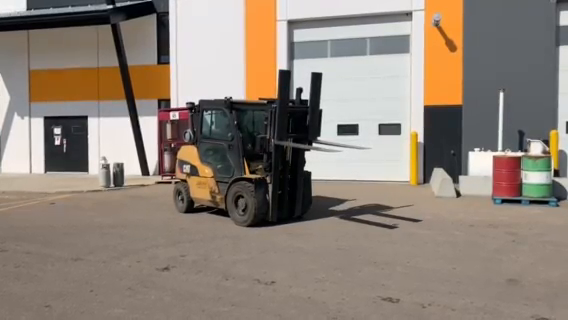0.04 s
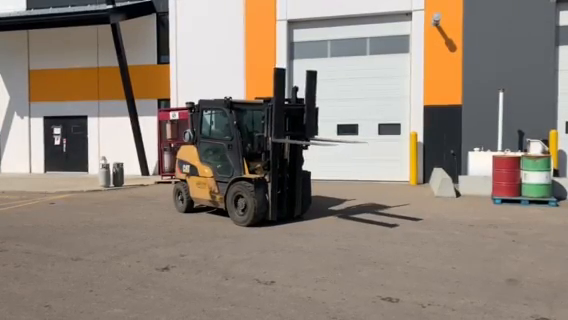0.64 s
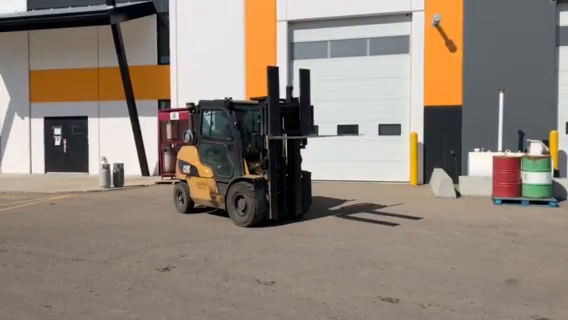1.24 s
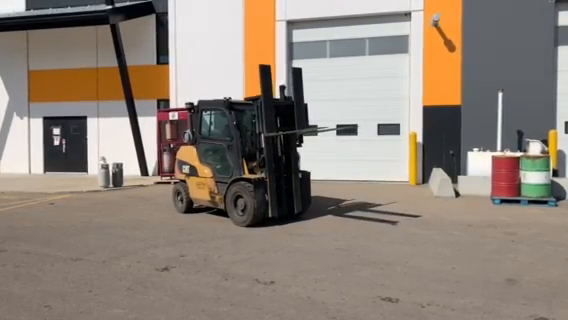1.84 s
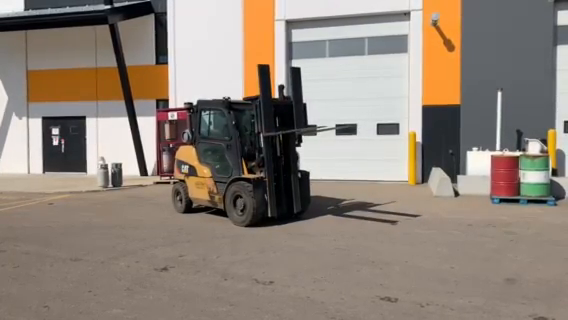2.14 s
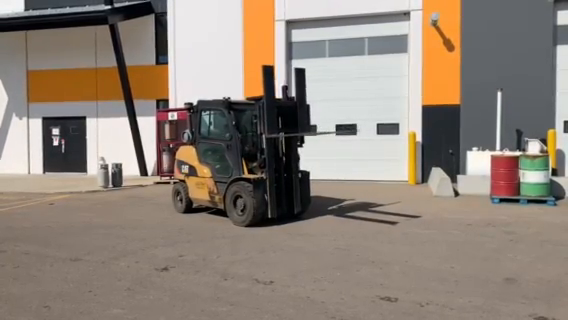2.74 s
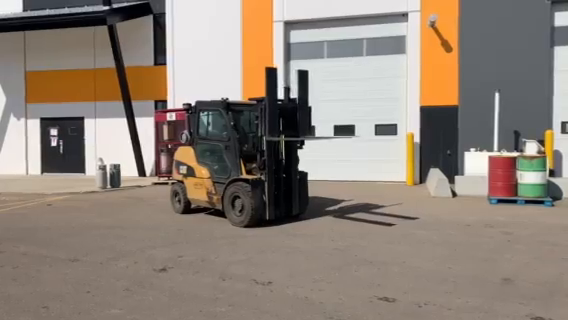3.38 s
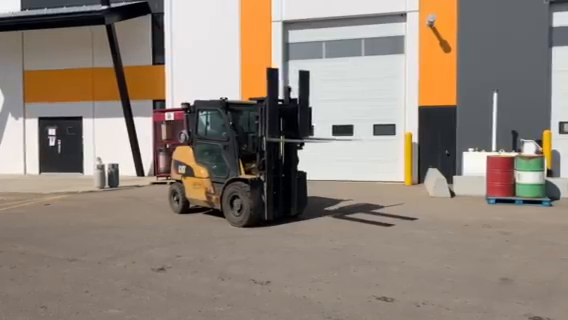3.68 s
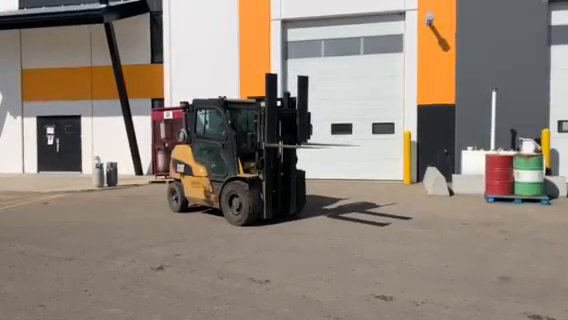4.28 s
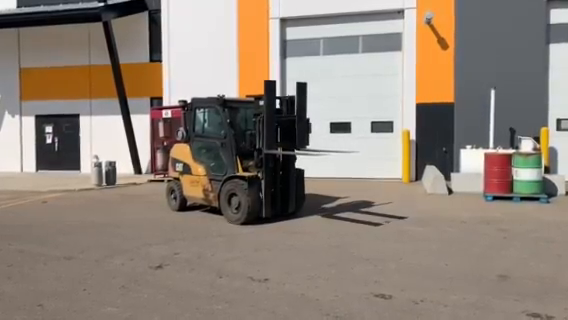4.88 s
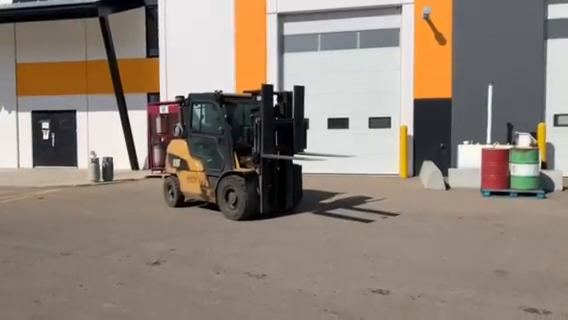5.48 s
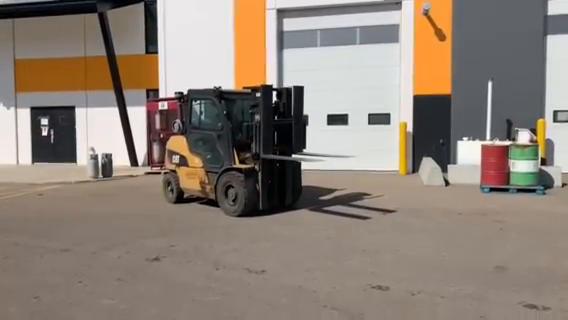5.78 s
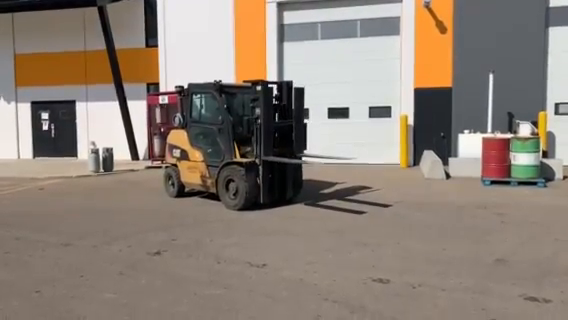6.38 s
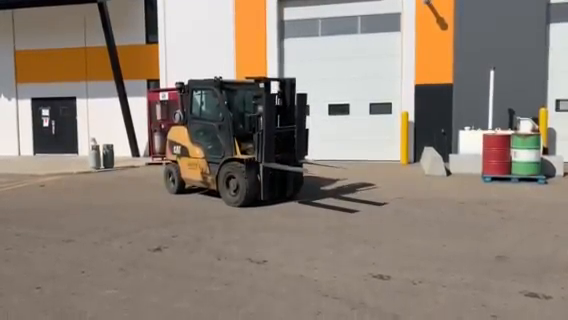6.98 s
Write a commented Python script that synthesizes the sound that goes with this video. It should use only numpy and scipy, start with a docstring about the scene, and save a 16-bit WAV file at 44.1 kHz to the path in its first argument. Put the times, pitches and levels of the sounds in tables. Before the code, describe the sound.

A forklift engine rumbles throughout, heard from across an outdoor yard. A metal knock and a dull bump come right at the start, followed by small squeaks. From about 0.3 to 2.2 seconds a faint hydraulic pump whine sounds as the engine slows slightly. Sharp, bouncing steel clanks with chain clinks hit at about 2 and 2.4 seconds, echoing briefly off the walls. A lighter knock, a squeak and a short pump squeal come between 3.1 and 3.5 seconds. The forks rattle lightly a few times as the engine and its whine rise, peaking near 4.7 seconds and then falling. Oil hisses faintly from around 4 seconds. A few dull bumps come between 5.3 and 5.7 seconds, then a brief soft rush of air, and the engine runs on lower and a little quieter until 7 seconds.

```python
"""A forklift lifts and lowers its forks.

On a paved yard by a warehouse, the engine rumbles and revs, and the oil pump and a gear whine with it.
The pump squeals briefly, and later oil hisses through the lowering valve. The fork carriage knocks
against the mast (the upright steel frame) and bounces, jerking the chain; walls echo the knocks."""
import sys
import numpy as np
from scipy import signal
from scipy.fft import rfft, irfft, next_fast_len
from scipy.io import wavfile

SR = 44100
rng = np.random.default_rng(int(sys.argv[2]) if len(sys.argv) > 2 else 0)


def transcribe(u):
    """Save the signal u as a 16-bit wav file named by the first command-line argument.

    u: samples, shape (n,) or (channels, n), limited to [-1, 1]; the rate is SR.
    q: integer samples, one column per channel.
    """
    v = np.clip(np.atleast_2d(u).T, -1, 1)
    q = np.round(v * 32767).astype(np.int16)
    wavfile.write(sys.argv[1], SR, q)


N = 309567
CUTOFF_HZ = 15850
TEETH_PER_FIRING = 16.4   # pump teeth that pass for each firing of the engine
UNLOAD_S = 5.77   # the load comes off the engine

# tone colour of the exhaust: f/Hz, relative level/dB
EXHAUST_COLOUR = [(50, -20), (75, 2.5), (115, 3.5), (180, 1.5), (225, -2.5), (290, -4), (360, -4.5),
                  (500, -28)]
# strokes, when the pump works against pressure: start/s, end/s, whine/dB, oil hiss/dB, sag/(dB per s)
PUMP_STROKES = [(.29, 2.2, -46, -52.5, -3.5), (2.45, 3.05, -64, -55, -8), (3.09, 3.68, -39.5, -53.5, -24)]


def from_db(db):
    """Turn decibels into a factor to multiply by."""
    return 10 ** (np.asarray(db) / 20)


def rms_one(x):
    """Scale a signal to an average power of 1."""
    return x / np.sqrt(np.mean(x ** 2) + 1e-20)


def seconds():
    """The time of every sample."""
    return np.arange(N) / SR


def in_time(points):
    """Join (time, value) points with straight lines, one value per sample."""
    return np.interp(seconds(), *np.transpose(points))


def at_hz(points, hz):
    """Read between (frequency, value) points, with octaves evenly spaced."""
    f, value = np.transpose(points)
    return np.interp(np.log(hz), np.log(f), value)


def drift(rate_hz):
    """A smooth random wobble of typical size 1; a higher rate wobbles faster."""
    pole = np.exp(-80 * np.pi * rate_hz / SR)
    white = rng.standard_normal(N // 40 + 2002)   # one value per 40 samples, plus a run-in
    slow = signal.lfilter([1], [1, -2 * pole, pole * pole], white)[2000:]
    return np.interp(np.arange(N) / 40, np.arange(len(slow)), rms_one(slow))


def dull(x, hz):
    """Gently soften the treble above hz."""
    return signal.sosfilt(signal.butter(1, min(hz, SR / 2 - 1000), fs=SR, output="sos"), x)


def switch_on(s, takes_s):
    """A smooth step from 0 to 1 around time s."""
    return .5 + .5 * np.tanh(2 * (seconds() - s) / takes_s)


def stroke(start, end, sag_db_per_s=0, ramp_s=0.045):
    """Pressure builds, holds or sags, and is let go."""
    sag = from_db(sag_db_per_s * np.clip(seconds() - start, 0, end - start))
    return switch_on(start, ramp_s) * sag * (1 - switch_on(end, ramp_s))


def swell(s, half_length):
    """A smooth bump that peaks at time s."""
    return np.exp(-((seconds() - s) / half_length) ** 2)


def burst(s, rise_s, fade_s):
    """A quick rise from time s, then a fade. Every fade time here is the time to drop 60 dB."""
    age = np.maximum(seconds() - s, 0)
    return np.minimum(age / rise_s, 1) * from_db(-60 * np.maximum(age - rise_s, 0) / fade_s)


def tone(cycles, flutter_db, wander):
    """A nearly pure tone that trembles in level and in phase (wander, in radians)."""
    return np.sqrt(2) * from_db(flutter_db * drift(25)) * np.sin(2 * np.pi * cycles + wander * drift(17))


def noise(colour, shape=lambda hz: 1, size=N, spread=1):
    """Stereo noise of power 1, in bands a third of an octave wide; shape(hz) moves each band's level."""
    # how alike left and right are: f/Hz, likeness (1 = the same)
    likeness = [(50, 0.77), (200, 0.95), (400, 0.87), (700, 0.38), (1400, 0.23), (3000, 0.3), (5000, 0.073),
                (7000, 0.97), (8500, 1), (11000, 0.66), (13500, .9), (15500, 0.65)]
    low, high = colour[0][0], min(colour[-1][0], CUTOFF_HZ)
    edges = 20 * 2 ** (np.arange(30) / 3)
    white, out = rng.standard_normal((2, 2, size)), 0
    for k, band in enumerate(zip(edges, edges[1:])):
        hz = np.sqrt(band[0] * band[1])
        if low < hz < high:
            mid, side = signal.sosfilt(signal.butter(2, band, "band", fs=SR, output="sos"), white[k % 2])
            apart = np.clip((1 - at_hz(likeness, hz)) * spread, 0, 2)
            pair = np.sqrt(2 - apart) * mid + np.sqrt(apart) * side * [[1], [-1]]
            out = out + from_db(at_hz(colour, hz)) * shape(hz) * pair
    return rms_one(out)


def resonant_noise(hz, width):
    """Stereo noise of power 1 that rings around one pitch."""
    b, a = signal.iirpeak(hz, hz / width, fs=SR)
    white = rng.standard_normal((2, N))
    return rms_one(signal.lfilter(b, a, signal.lfilter(b, a, white)))


def throttle(revs, lag_s=0.84):
    """Heads for 1 (open) as the engine speeds up and for -1 (shut) as it slows, lagging behind."""
    pole = np.exp(-1 / (lag_s * SR))
    return np.tanh(4 * signal.lfilter([1 - pole], [1, -pole], np.gradient(revs) * SR))


def engine(firings, firing_hz, revs, waver_db=4.0, muffler_hz=400):
    """Each firing puffs into the exhaust and rattles the engine block; the chassis rumbles below."""
    # tones of the exhaust: multiple of the firing rate, relative level/dB
    exhaust_tones = [(1, 5), (1.5, 2), (2, -0.5), (2.5, 0), (3, 3.5), (4, 0), (5, -5), (6, -0.5)]
    # tone colours of the block and the chassis: f/Hz, relative level/dB
    block_colour = [(250, 2), (460, 0.5), (600, 4), (740, 2.5), (1000, -0.5), (1400, -6), (1800, -9),
                    (2300, -14), (2800, -19.5), (3500, -19.5), (6000, -46)]
    chassis_colour = [(20, -47), (31, -52), (43, 12), (60, 14), (80, 10.5), (120, -3)]
    # deep rumble of the chassis: t/s, level/dB
    rumble = [(0, -30.5), (1.2, -33), (2.7, -31), (3.3, -34), (4.3, -31.5), (5.2, -37), (7.02, -34)]
    unloaded, push = switch_on(UNLOAD_S, takes_s=0.036), throttle(revs)
    exhaust_db = -29 + 7 * revs + 0.5 * push - 3.5 * unloaded
    block_db = -37.5 + 1.5 * revs + push - 1.5 * unloaded
    beat = np.cos(2 * np.pi * firings + 0.31 * drift(6.5))
    # uneven burning makes every tone waver in level and phase
    note = sum(from_db(db + at_hz(EXHAUST_COLOUR, k * firing_hz) + waver_db * drift(4.9))
               * np.sin(2 * np.pi * k * firings + 0.89 * drift(3.7)) for k, db in exhaust_tones)
    gas = noise(EXHAUST_COLOUR, lambda hz: from_db(-0.5 * beat + 2.1 * drift(16.8)))
    puffs = from_db(exhaust_db) * (from_db(-2.5) * rms_one(note) + gas)
    exhaust = signal.sosfilt(signal.butter(10, muffler_hz, fs=SR, output="sos"), puffs)
    clatter = from_db(0.04 * beat + .5 * drift(21))
    block = from_db(block_db) * noise(block_colour, lambda hz: clatter * from_db(drift(27)))
    shake = np.sqrt(2) * np.sin(2 * np.pi * firings + 1.1 * drift(3.7))
    chassis = from_db(in_time(rumble)) * (noise(chassis_colour) + .5 * shake)
    return exhaust + block + chassis


def intake(firings, revs, gulp_db=3.0, boom_db=-3.0):
    """Each cylinder gulps air through a ringing duct, which growls and booms near full speed."""
    # where the duct rings: f/Hz, width/Hz, relative level/dB
    resonances = [(214, 44, -3), (330.4, 55, -9), (690, 320, -14.5)]
    duct = sum(from_db(db) * resonant_noise(hz, width)[0] for hz, width, db in resonances)
    boom = from_db(boom_db) * tone(3 * firings, flutter_db=2.5, wander=.5)
    gulps = from_db(gulp_db * np.cos(2 * np.pi * firings))
    return from_db(-52 + 47 * revs) * (gulps * duct + boom)


def pump_shell(revs):
    """The running engine shakes the thin pump housing into a faint, rough ring."""
    return from_db(-61 + 9 * revs + 2 * drift(10)) * resonant_noise(hz=2315, width=110)[0]


def hiss(air_db=-54.5, rush_db=-52, rush_s=0.32):
    """Air hisses steadily and oil with each stroke; air rushes briefly as the load comes off."""
    # tone colours of the hiss and the rush: f/Hz, relative level/dB
    hiss_colour = [(2000, 6), (3400, 4.5), (5000, 1), (7000, 2.5), (8500, 2.5), (10500, -0.5),
                   (13000, -4.5), (16000, -14)]
    rush_colour = [(2300, -14), (3000, 3), (3600, -9), (4500, -21), (6000, -7), (8000, -16)]
    oil = sum(from_db(db) * stroke(start, end) for start, end, _, db, _ in PUMP_STROKES)
    air_and_oil = np.hypot(from_db(air_db), oil) * noise(hiss_colour, lambda hz: from_db(drift(34)))
    rush = from_db(rush_db) * stroke(UNLOAD_S, UNLOAD_S + rush_s) * noise(rush_colour)
    return air_and_oil + rush


def chain(rise_s=0.0039, fade_s=0.18):
    """The links of the jerked lift chain clash in short, bright bursts."""
    # clinks: t/s, level/dB
    clinks = [(.004, -31.5), (1.949, -32), (2.044, -34.5), (2.384, -34.5), (2.499, -34.5)]
    # their tone colour: f/Hz, relative level/dB
    colour = [(2000, 7), (2800, -6), (3600, -2), (5200, 1), (7500, -6), (11000, -1), (16000, -9)]
    ages = [(np.maximum(seconds() - s, 0), db) for s, db in clinks]
    level = sum(from_db(db - 60 * age / fade_s) * np.minimum(age / rise_s, 1) for age, db in ages)
    return level * noise(colour, spread=0.66)


def mast_ring(t, ring_db, favoured_hz, crack_s=0.0048):
    """The struck mast gives a noisy clang, which cracks and then dies band by band, and clear tones."""
    # clear tones of the mast: f/Hz, relative level/dB, fade/s
    modes = [(253, 1, 0.35), (317.6, 0, 0.5), (349.5, 2.5, 0.44), (425, 3.5, 0.3), (547, 8.5, 0.15),
             (596, 5, 0.13), (752, 6, 0.18), (856.5, 6.5, 0.14), (1027, -0.5, 0.21), (1212, 1, 0.13),
             (1291, -1, .12), (1416, -6, .15), (1583, -2.5, 0.18), (1790, -3.5, .18), (2195, -2.5, .15),
             (2280, -0.5, 0.18), (2720, -5, 0.18), (3430, -11, 0.33), (4070, -16, 0.27), (4670, -16, .19)]
    # tone colour of the clang: f/Hz, relative level/dB
    colour = [(100, 6), (220, 6), (500, 6.5), (800, 0), (1200, -0.5), (1750, 0), (2400, -6), (2850, -7.5),
              (3400, -13.5), (4500, -16.5), (7000, -16.5), (11000, -14), (16000, -21)]
    # how long the clang lasts: f/Hz, fade/s
    fades = [(200, 0.41), (600, 0.34), (2000, 0.28), (5000, 0.31), (14000, 0.3)]

    def favour(hz, boost_db=5, octaves=0.16):
        """The spot that is hit brings out the tones around one pitch."""
        return boost_db * np.exp(-(np.log2(hz / favoured_hz) / octaves) ** 2)

    crack = 1.9 * np.exp(-t / crack_s)
    clang = noise(colour, lambda hz: from_db(favour(hz) / 2)
                  * (from_db(-60 * t / at_hz(fades, hz)) + crack), size=len(t), spread=0.26)
    ring = sum((-1) ** k * from_db(db + favour(hz) - 60 * t / fade_s) * np.sin(2 * np.pi * hz * t)
               for k, (hz, db, fade_s) in enumerate(modes))
    return clang / np.sqrt(len(t)), from_db(ring_db) * rms_one(ring) / np.sqrt(len(t))


def knocks(chatter_db=3.5, strength_db=22.5, bounce_s=0.034, graze_s=.006, graze_db=-14):
    """Loose steel grazes, lands and chatters while the mast rings on; the walls answer."""
    # hits, bounces and the loudest wall echoes: t/s, relative level/dB, brightness/Hz, contact/s, ring/dB,
    # favoured pitch/Hz
    hits = [(.006, -18, 14000, 0.0021, 1.5, 1120), (.041, -21.5, 3000, .003, 0, 850),
            (.105, -25, 9130, 0.0027, -5, 1890), (1.950, -10, 6000, .004, -1, 2270),
            (1.9555, -8.5, 9000, .003, 1, 1030), (1.961, -15, 2500, 0.0028, -2, 600),
            (1.987, -16, 9000, 0.0027, 2, 425), (2.047, -24, 12000, 0.0056, -1, 2250),
            (2.060, -23.5, 9000, .004, -1, 750), (2.3956, -14.5, 5005, 0.0027, 0, 1590),
            (2.401, -15, 3000, .003, 2, 548), (2.414, -20, 1500, .003, 3, 548),
            (2.429, -20.5, 4000, 0.0034, 0, 1590), (2.459, -24, 700, .004, 6, 350),
            (2.504, -20, 7000, 0.0026, -0.5, 2200), (3.101, -23, 700, .0038, 3, 548),
            (3.187, -19, 9000, 0.0087, 0, 1950)]
    # echoes from the walls: delay/s, relative level/dB, brightness/Hz
    walls = [(0.035, -16, 7960), (.103, -15, 6000), (0.215, -24.5, 4000)]
    out, t = np.zeros((2, N)), np.arange(SR // 2) / SR
    for s, db, bright_hz, contact_s, ring_db, favoured_hz in hits:
        contact = 1 - np.exp(-(2 * t / contact_s) ** 2)
        chatter = from_db(chatter_db * drift(90)[:len(t)] * (0.5 - np.exp(-t / bounce_s)))
        clang, ring = mast_ring(t, ring_db, favoured_hz)
        blow = dull((clang * chatter + ring) * contact, bright_hz)
        at = round(s * SR)
        out[:, at:at + len(t)] += from_db(db + strength_db) * blow[:, :N - at]
    # the graze is a softer copy just ahead of each hit
    graze = from_db(graze_db) * np.pad(out, [(0, 0), (0, round(graze_s * SR))])[:, -N:]
    echoes = sum(from_db(db) * dull(np.pad(out, [(0, 0), (round(s * SR), 0)])[:, :N], hz)
                 for s, db, hz in walls)
    return graze + out + echoes


def jolts():
    """The chassis booms briefly on its tyres."""
    # dull bumps: t/s, level/dB, half length/s, f/Hz
    bumps = [(0.008, -19.5, 0.028, 66), (2.462, -26, 0.14, 74), (4.335, -24, 0.045, 74),
             (5.28, -26.5, 0.035, 170), (5.562, -18.5, 0.058, 78), (5.723, -22.5, 0.023, 130)]
    waver, thud = 1.6 * drift(15.6), 0.39 * noise(EXHAUST_COLOUR)
    out = 0
    for s, db, half_length, hz in bumps:
        boom = np.sqrt(2) * np.sin(2 * np.pi * hz * seconds() + waver)
        out = out + from_db(db) * swell(s, half_length) * (boom + thud)
    return out


def roller_squeaks():
    """A mast roller sticks and slips, scraping out a thin ring that dies away."""
    # squeaks: t/s, f/Hz, width/Hz, level/dB, rise/s, fade/s
    squeaks = [(.283, 4800, 120, -48, .018, .17), (.355, 4680, 450, -52, .02, .5),
               (.489, 4840, 110, -39, 0.007, .1), (3.109, 8050, 447, -34, .004, 0.12)]
    return sum(from_db(db) * burst(s, rise_s, fade_s) * resonant_noise(hz, width)
               for s, hz, width, db, rise_s, fade_s in squeaks)


def pump_whine(teeth, tooth_hz, revs, flutter_db=2.0):
    """The pump sings as its teeth pass: rich under pressure, just a note and its octave when free."""
    # the note and its overtones, lowest first: relative level/dB
    harmonics = [1, -10, -15, -19, -22.5, -23]
    # where the pump housing rings: f/Hz, width/Hz, boost/dB
    housing = [(2095, 29, 13.5), (2210, 70, 9.5), (2322, 34, 12), (2782, 85, 10)]
    working = sum(from_db(db) * stroke(start, end, sag) for start, end, db, _, sag in PUMP_STROKES)
    free = from_db(-78.5 + 62.5 * revs) * (1 + 0.41 * drift(120))
    # every firing jerks the shaft forward, which roughens the high overtones most
    jerk = 0.11 * (np.sin(2 * np.pi * teeth / TEETH_PER_FIRING) + 2.2 * drift(23))
    out = 0
    for k, db in enumerate(harmonics, 1):
        housing_db = sum(boost * np.exp(-((k * tooth_hz - hz) / width) ** 2)
                         for hz, width, boost in housing)
        drive = working + (k <= 2) * free * from_db(-7.5 * np.log2(k))
        phase = k * (2 * np.pi * teeth + jerk + 0.39 * drift(24))
        # a reflection from a wall wavers separately on the left and right
        reflected = 0.24 * k * np.array([drift(37), drift(11)]) * np.cos(phase)
        flutter = from_db(flutter_db * drift(22) + 0.59 * k * drift(57))
        out = out + from_db(db + housing_db) * drive * flutter * (np.sqrt(2) * np.sin(phase) + reflected)
    return out


def oil_churn(flutter_db=2.0):
    """Oil churns in the pump through the long lift and thickens its whine."""
    # bands of churning: f/Hz, width/Hz, level/dB
    bands = [(1868, 80, -57), (2100, 81, -54), (2310, 76, -59.5), (2740, 96, -56.5), (4220, 200, -64.5)]
    start, end, _, _, sag = PUMP_STROKES[0]
    churn = sum(from_db(db + flutter_db * drift(18)) * resonant_noise(hz, width)[0]
                for hz, width, db in bands)
    return stroke(start, end, sag) * churn


def gear_whine(teeth, ratio=18 / 11):
    """While it is under load, a gear sings a note above the pump's."""
    # times under load: start/s, end/s, level/dB
    loads = [(0.414, 0.694, -45), (0.752, 1.05, -50.5), (1.053, 2.0, -43.5), (5.85, 6.303, -54.5)]
    level = sum(from_db(db) * stroke(start, end) for start, end, db in loads)
    return level * tone(ratio * teeth, flutter_db=2.0, wander=0.42)


def fork_rattles(rise_s=.011, chatter_db=3.0):
    """The loose forks shake briefly on their bar."""
    # muted shakes: t/s, level/dB, fade/s
    shakes = [(2.168, -35, .12), (3.279, -40, .3), (3.792, -41, 0.26), (3.9, -39.5, .12),
              (4.525, -35.5, .16)]
    # their tone colour: f/Hz, relative level/dB
    colour = [(900, -3), (1400, -1), (1900, 3.5), (2300, -2), (2900, -18), (4500, -19), (7000, -28)]
    level = sum(from_db(db) * burst(s, rise_s, fade_s) for s, db, fade_s in shakes)
    return level * from_db(chatter_db * drift(74)) * noise(colour)


def pump_squeal(teeth, harmonic=4):
    """The pump's fourth harmonic swells into a squeal, falling as the engine bogs down."""
    # swells of the squeal: peak/s, half length/s, level/dB
    swells = [(3.15, .055, -56), (3.315, .05, -48), (3.35, .2, -56)]
    level = sum(from_db(db) * swell(s, half_length) for s, half_length, db in swells)
    rasp = 1 + .25 * drift(110)
    return level * rasp * tone(harmonic * teeth + .04 * drift(70), flutter_db=1.0, wander=.4)


def lowering_valve(sputter_db=1.8, opens_s=.06):
    """Oil forced through the valve hisses, whistles and sputters."""
    # bands of hiss: start/s, f/Hz, width/Hz, level/dB, change/(dB per s)
    bands = [(4.1, 14970, 1489, -52, -20), (4.1, 15000, 300, -60.5, -.5), (4.35, 6470, 524, -60.5, 2),
             (4.35, 10730, 3475, -58, -14), (6.52, 10970, 3492, -58.5, 0)]
    out = 0
    for s, hz, width, db, db_per_s in bands:
        level = from_db(db + db_per_s * np.maximum(seconds() - s, 0) + sputter_db * drift(10))
        out = out + level * switch_on(s, opens_s) * resonant_noise(hz, width)
    return out


def microphone_ports(left, right):
    """The microphone's two openings agree in the bass but slip out of step and balance in the treble."""
    # how far the left leads the right: f/Hz, phase/radians
    lead = [(0, 0), (600, 0), (1900, 0.08), (2700, 1.46), (3700, 3.5), (4650, 7), (5300, 8), (6250, 7),
            (7450, 5.5), (7840, 3.5), (9400, 4.5), (10350, -2), (11600, -0.5), (12500, -3), (14200, -3),
            (14850, -6.2)]
    # how much louder the right is: f/Hz, level/dB
    balance = [(100, 0.6), (380, -0.5), (700, 0.9), (1300, -0.3), (2400, 1.5), (4400, 3), (8000, 0),
               (15000, -.2)]
    size = next_fast_len(N + SR // 10)
    hz = np.arange(size // 2 + 1) * SR / size
    phase = np.interp(hz, *np.transpose(lead))
    tilt = from_db(at_hz(balance, hz + 1) / 2)
    return irfft([rfft(left, size) / tilt, rfft(right, size) * tilt * np.exp(-1j * phase)], size)[:, :N]


def scene(mast_pan_db=0.43):
    """Engine, oil system and mast, heard from across the yard."""
    # engine speed, as the rate at which pump teeth pass: t/s, f/Hz
    speed = [(0, 809.5), (.33, 785.4), (.6, 708), (1.3, 693.2), (1.88, 697), (2.0, 716.6), (2.75, 877),
             (3.16, 904), (3.26, 854), (3.42, 823), (3.6, 811.6), (4.1, 1046), (4.35, 1125), (4.55, 1161),
             (4.72, 1192), (4.87, 1162), (5.2, 1008), (5.5, 894.6), (6.2, 818.6), (7.02, 709)]
    tooth_hz = in_time(speed)
    revs = np.log2(tooth_hz / 800)   # octaves above cruising speed
    teeth = np.cumsum(tooth_hz) / SR   # teeth passed so far
    firings = teeth / TEETH_PER_FIRING
    motor = engine(firings, tooth_hz / TEETH_PER_FIRING, revs) + intake(firings, revs) + jolts()
    pump = pump_whine(teeth, tooth_hz, revs) + gear_whine(teeth) + oil_churn() + pump_shell(revs)
    flow = hiss() + lowering_valve()
    mast = (knocks() + fork_rattles() + chain()) * from_db([[-mast_pan_db], [mast_pan_db]])
    # the pump's squeal and the roller squeaks skip the left-right phase shift
    return microphone_ports(*(motor + pump + flow + mast)) + pump_squeal(teeth) + roller_squeaks()


def record(dry):
    """The microphone drops the deepest bass and cuts the highest treble; the tallest peaks are gently rounded."""
    thin = signal.sosfilt(signal.butter(2, 24, "high", fs=SR, output="sos"), dry)
    rounded = 1.5 * np.tanh(thin / 1.5)
    return signal.sosfilt(signal.ellip(10, .1, 80, CUTOFF_HZ, fs=SR, output="sos"), rounded)


dry = scene()
out = record(dry)
transcribe(out)
```